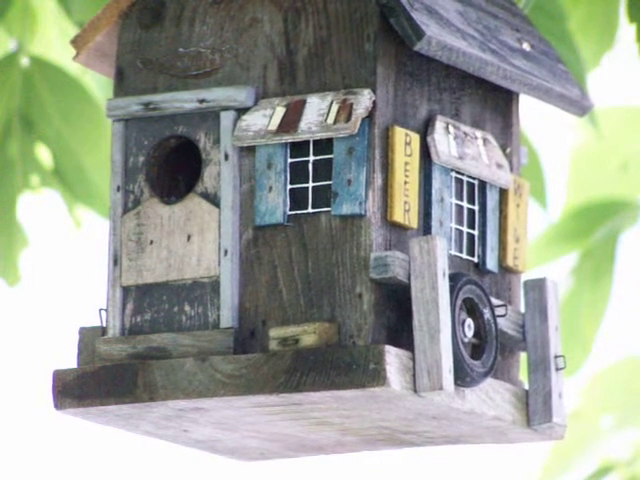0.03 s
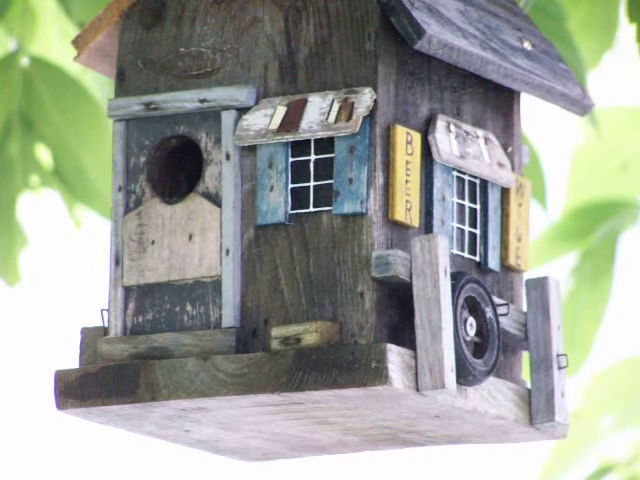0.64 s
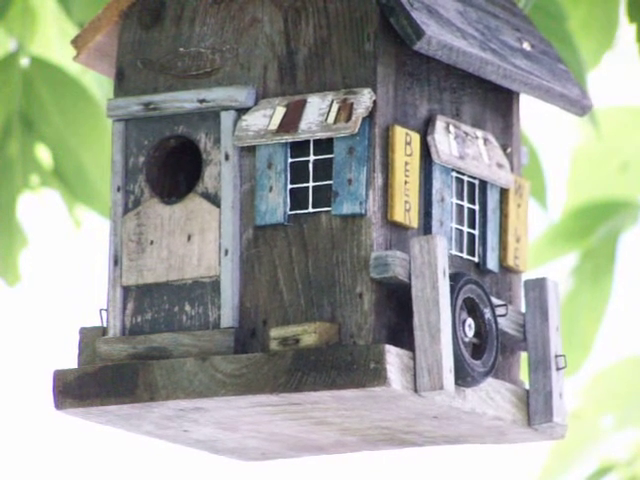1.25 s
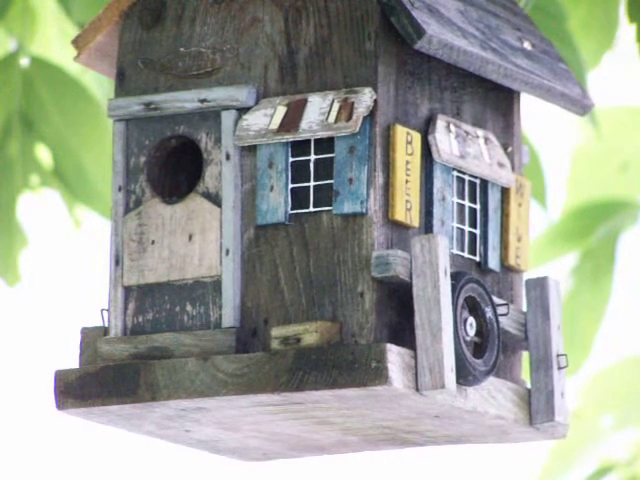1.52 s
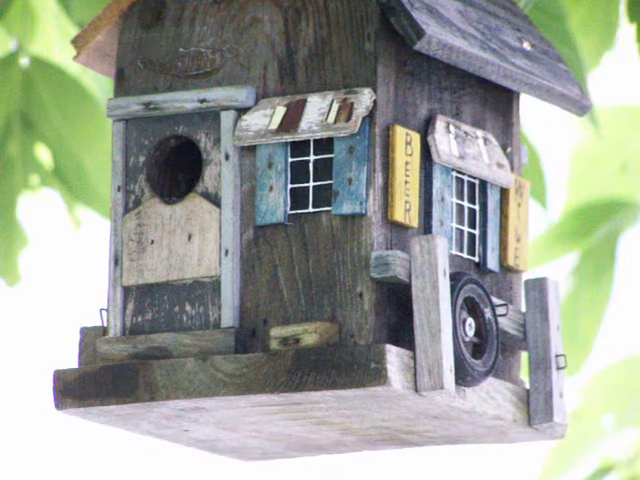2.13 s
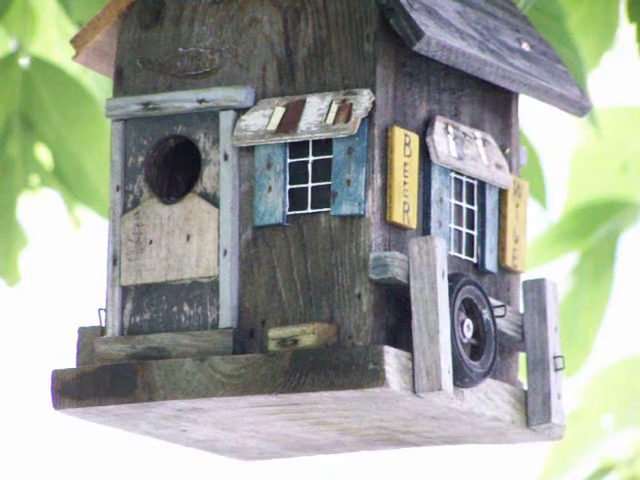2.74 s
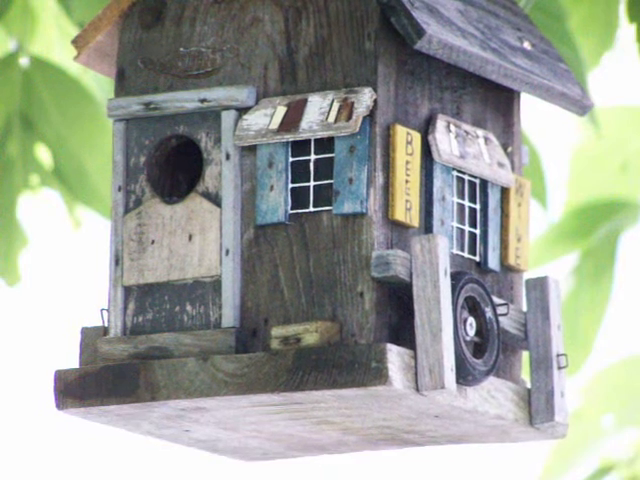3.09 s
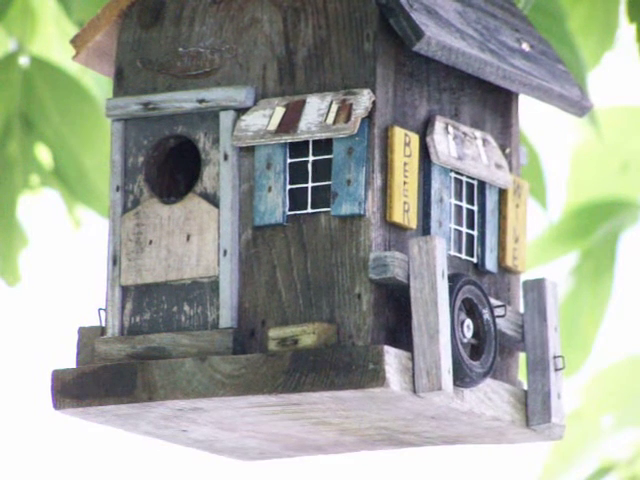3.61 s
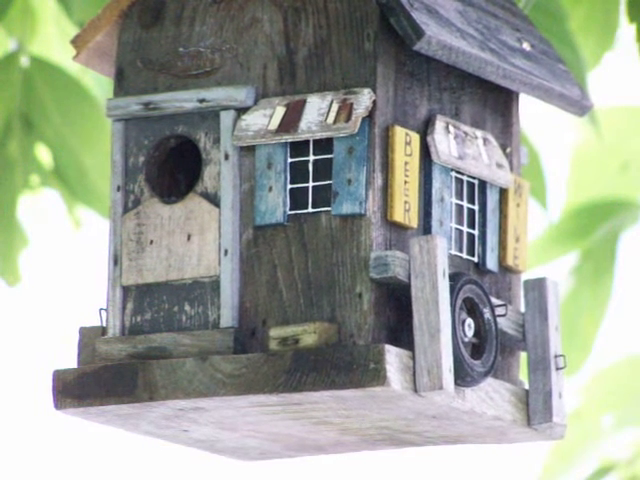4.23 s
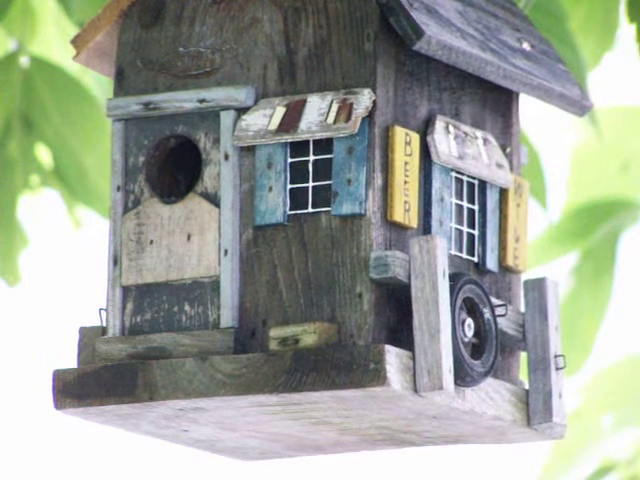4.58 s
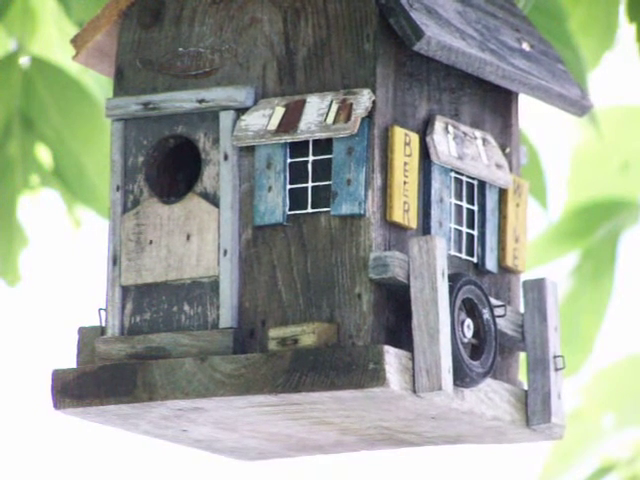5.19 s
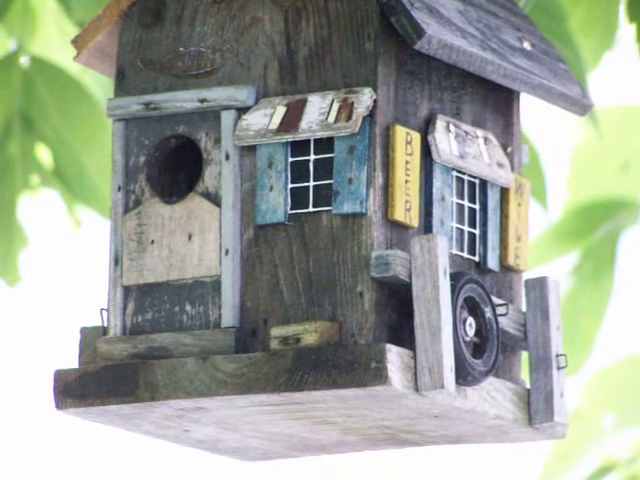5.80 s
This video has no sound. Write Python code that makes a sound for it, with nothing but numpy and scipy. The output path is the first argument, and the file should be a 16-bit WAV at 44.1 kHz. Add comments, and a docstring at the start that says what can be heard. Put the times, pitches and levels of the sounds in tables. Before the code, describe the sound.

In a quiet garden, small claws tick on a wooden birdhouse. A rooster crows once in the distance while little wings flutter in short bursts near the microphone. A bird then darts very close with a whirr and several sharp feather snaps, the loudest moment. Another brief flutter follows, then a faint hiss of begging nestlings, thin high whistles and a few more scratches over soft outdoor air.

```python
"""Small birds flutter around a wooden nest box in a leafy garden, and one darts close by.
Their wingbeats, sharp feather snaps and scratching claws are friction sounds: clusters of tiny slips
and hiss that excite the resonances of the box. Nestlings beg with a thin hiss and a bird whistles high.
Farther off a rooster crows once, a harmonic voice shaped by its throat. Wings, claws, whistles and crow
scatter into short echoes over a quiet outdoor background."""
import sys
import numpy as np
from scipy import signal
from scipy.fft import rfft, irfft, next_fast_len
from scipy.io import wavfile

SR = 44100
rng = np.random.default_rng(int(sys.argv[2]) if len(sys.argv) > 2 else 0)


def unload_wav(signal):
    """Save mono or channel-first audio to the path in sys.argv[1] as 16-bit WAV at rate SR, clipped to [-1, 1]."""
    wavfile.write(
        sys.argv[1],
        SR,
        np.round(np.clip(np.atleast_2d(signal).T, -1, 1) * 32767).astype(np.int16),
    )


N = 256220
TIME = np.arange(N) / SR


def amp(db):
    """Decibels to amplitude ratio."""
    return 10 ** (np.asarray(db) / 20)


def unit(x):
    """Normalisation to rms 1."""
    return x / np.sqrt(np.mean(x ** 2) + 1e-20)


def read(points, hz):
    """Interpolation on a logarithmic frequency axis."""
    f, value = np.transpose(points)
    return np.interp(np.log(hz + 1), np.log(f + 1), value)


def add(mix, s, sound):
    """Superposition: a sound joins the mix at s seconds, or at zero if s is negative."""
    part = mix[max(round(s * SR), 0):][:len(sound)]
    part += sound[:len(part)]


def colour(x, points, shift=1):
    """Filtering by a spectral envelope, its frequencies multiplied by shift."""
    hz = np.fft.rfftfreq(len(x), 1 / SR)
    return irfft(rfft(x) * amp(read(points, hz / shift)), len(x))


def drift(size, hz):
    """Low-pass noise: smooth random motion up to about hz, with rms near 1."""
    span = next_fast_len(max(size, SR), True)
    f = np.fft.rfftfreq(span, 1 / SR)
    return unit(irfft(rfft(rng.standard_normal(span)) * np.exp(-(f / hz) ** 2), span))[:size]


# Outdoor noise spectrum. Each row: frequency in Hz, relative level in dB.
AIR_SPECTRUM = [(15, -33.5), (25, 3.5), (132, -2.5), (181, -5), (274, -9), (729, -14), (886, -13),
                (1670, -16.5), (3570, -19.5), (5820, -22.5), (7070, -22.5), (7990, -30), (8600, -41),
                (11200, -66), (18900, -120)]
# Faint high tones. Each row: frequency in Hz, level in dB.
WHINE_TONES = [(7838, -77), (7897, -78), (8102, -81), (8161, -82)]

def background():
    """Broadband noise gives rumble and hiss; phase-modulated tones add a faint wavering whine."""
    air = unit(colour(rng.standard_normal(N), AIR_SPECTRUM)) * amp(-52 + 0.087 * drift(N, hz=8))
    whine = sum(amp(db) * np.sqrt(2) * np.sin(2 * np.pi * hz * TIME + 1.5 * drift(N, hz=20))
                for hz, db in WHINE_TONES)
    return air + whine


# Spectrum of sliding feathers. Each row: frequency in Hz, relative level in dB.
FEATHER_SPECTRUM = [(600, -47), (1950, -23), (2450, -5.5), (2800, -6.5), (3300, 0), (3750, 3), (4250, -0.5),
                    (4650, -1.5), (5700, -10.5), (6700, -20.5), (8500, -43.5)]
# Envelope of the rustle. Each row: time in seconds, relative level in dB.
RUSTLE_ENVELOPE = [(0, -57), (.45, -53), (.8, -55.5), (1.1, -48), (1.2, -57), (2.1, -58.5), (3.25, -54.5),
                   (3.55, -56.5), (4.2, -54.5), (5.15, -65.5), (5.35, -52.5), (5.81, -59.5)]

def rustle():
    """Soft feather friction: random amplitude modulation makes noise grainy."""
    grains = rng.standard_normal(N) * amp(1.7 * drift(N, hz=300) + 1.3 * drift(N, hz=25))
    return unit(colour(grains, FEATHER_SPECTRUM)) * amp(np.interp(TIME, *np.transpose(RUSTLE_ENVELOPE)))


# High notes. Each row: start and length in seconds, first and last pitch in Hz, peak level in dB.
WHISTLE_NOTES = [(-.1, 0.23, 5150, 5010, -69), (1.157, 0.15, 7040, 6940, -64),
                 (2.117, .36, 6900, 7200, -66.5), (4.746, .04, 2720, 3780, -52),
                 (4.701, 0.34, 7170, 7200, -63), (4.978, 0.23, 7200, 7080, -60),
                 (5.23, 0.27, 7320, 7340, -66.5)]

def whistles():
    """Frequency modulation: pure tones glide with a fast irregular quaver as they swell and fade."""
    out = np.zeros(N)
    for start, length, from_hz, to_hz, db in WHISTLE_NOTES:
        progress = np.linspace(0, 1, round(length * SR), endpoint=False)
        hz = (from_hz + (to_hz - from_hz) * progress) * (1 + 0.021 * drift(len(progress), hz=240))
        note = np.sqrt(2) * np.sin(2 * np.pi * np.cumsum(hz) / SR)
        add(out, start, amp(db) * note * np.sin(np.pi * progress) ** 0.71)
    return out


def friction(rows, spectrum, ticks_per_s, hiss, crest, spread_db, ring_db, ring_width_hz, broaden=0):
    """Stick-slip friction: each stroke is a swell of ticks and hiss, ringing at its centre frequency."""
    out = np.zeros(N)
    margin, spectrum_centre_hz = 512, 3750
    for start, length, db, hz in rows:
        size = int(1.5 * length * SR)
        progress = np.arange(size) / (length * SR)
        travel = np.cumsum(rng.exponential(1, size) ** 2) * ticks_per_s / (2 * SR) + rng.random()
        slips = np.diff(np.floor(travel), prepend=0) > 0
        ticks = slips * amp(spread_db * rng.standard_normal(size)) * rng.choice([-1, 1], size)
        swell = np.interp(progress, [0, crest, .8, 1.05, 1.5], [.25, 1, .7, .2, 0])
        burst = np.pad(swell * (unit(ticks) + hiss * rng.standard_normal(size)), margin)
        focus = 1 - broaden * np.clip((db + 35.5) / 10, 0, 1)  # a hard, close stroke is broader in band
        burst = colour(burst, [(f, focus * level) for f, level in spectrum], hz / spectrum_centre_hz)
        ring = signal.lfilter(*signal.iirpeak(hz, hz / ring_width_hz, SR), burst)
        burst = unit(burst) + amp(ring_db) * unit(ring)
        add(out, start - margin / SR, amp(db) * burst * np.sqrt(length * SR / np.sum(burst ** 2)))
    return out


# Claw strokes; those at .357 and 2.351 s swell into the snaps that follow. Each row: start and length in
# seconds, relative level in dB, centre in Hz.
CLAW_STROKES = [(.152, 0.011, -47, 3630), (.211, 0.0055, -48.5, 3850), (.229, 0.0053, -47, 3700),
                (.335, 0.021, -53, 3730), (.357, 0.012, -35.5, 3710), (.618, 0.0041, -40, 3320),
                (.687, 0.0093, -49, 3470), (2.351, 0.026, -41.5, 3370), (4.683, 0.017, -52.5, 3850),
                (5.287, .013, -47.5, 3700), (5.305, 0.0089, -39.5, 3820), (5.367, 0.0052, -39.5, 4250),
                (5.612, 0.041, -47, 4580)]
# Spectrum of a scratch. Each row: frequency in Hz, relative level in dB.
CLAW_SPECTRUM = [(800, -28.5), (2300, -15.5), (2950, -16.5), (3400, -1.5), (4000, -7.5), (4800, -9),
                 (6400, -17), (8500, -37)]

def claws():
    """Claws stick and slip on wood, giving ticks and hiss in equal parts."""
    return friction(CLAW_STROKES, CLAW_SPECTRUM, ticks_per_s=1000, hiss=1.0, crest=0.26,
                    spread_db=2.5, ring_db=-15, ring_width_hz=450)


# Feather snaps. Each row: start and length in seconds, relative level in dB, centre in Hz.
SNAP_STROKES = [(.365, 0.0038, -49, 3600), (.572, 0.004, -46.5, 3400), (2.359, .008, -26, 3230),
                (2.465, 0.0067, -40, 3530), (3.095, 0.0049, -13, 3770), (3.154, 0.0056, -19, 3000),
                (3.185, .0057, -16, 3620), (3.232, 0.0052, -15, 3970), (3.265, .0041, -20, 3610),
                (3.9, 0.0028, -25, 3780), (3.921, 0.0033, -32, 3500), (3.968, 0.0046, -51, 4000),
                (4.176, .014, -49.5, 3000), (5.8, 0.0081, -26.5, 4210)]
# Spectrum of a snap. Each row: frequency in Hz, relative level in dB.
SNAP_SPECTRUM = [(400, -45), (1200, -18.5), (1800, -16.5), (2300, -5), (2600, -10.5), (3000, 7), (3600, -4),
                 (4400, 4.5), (5200, -4), (6200, -6.5), (7500, -18.5), (8600, -31)]

def wing_snaps():
    """Impulsive excitation: feathers slip for a few milliseconds and drive a narrow resonance."""
    return friction(SNAP_STROKES, SNAP_SPECTRUM, ticks_per_s=1300, hiss=0.24, crest=0.18,
                    spread_db=1.5, ring_db=-6.5, ring_width_hz=69)


# The rooster's throat response from afar. Each row: frequency in Hz, gain in dB.
THROAT_SPECTRUM = [(400, -10), (520, 1.5), (640, -14.5), (730, -9.5), (1000, -2.5), (1250, -8.5),
                   (1470, -0.5), (1800, -7.5), (2200, -20), (2500, -11.5), (2850, -13), (3400, -23),
                   (4900, -34), (6200, -23.5), (7000, -36)]
# Its narrow resonances. Each row: centre and half-width in Hz, peak boost in dB.
THROAT_RESONANCES = [(2607, 39, 22), (5500, 40, 15), (6230, 90, 3.5)]

def clear_voice(hz, phase, rough, upper_db):
    """Source and filter: ten harmonics slide through the resonances of the throat."""
    voice = np.zeros(len(hz))
    for k in range(1, 11):
        rings_db = sum(peak / (1 + ((k * hz - centre) / width) ** 2)
                       for centre, width, peak in THROAT_RESONANCES)
        fading_db = 1.8 * drift(len(hz), hz=18)  # each harmonic's level wavers at random by itself
        db = read(THROAT_SPECTRUM, k * hz) + rings_db + fading_db + upper_db * (k > 2)
        weight = (1 - rough) ** 2 if k == 1 else 1  # a hoarse voice loses its fundamental
        voice += weight * amp(db) * np.cos(k * phase)
    return voice


# Pitch contour of the crow. Each row: time in seconds, pitch in Hz.
CROW_CONTOUR = [(.87, 698.5), (1.19, 725.3), (1.27, 743), (1.37, 727.3), (1.52, 718.3), (1.635, 741),
                (1.71, 713.2), (1.95, 695), (2.17, 672.7), (2.35, 639.7), (2.46, 581), (2.6, 482)]
# Spectrum of the rasp. Each row: frequency in Hz, relative level in dB.
RASP_SPECTRUM = [(400, -19), (750, -11), (1100, -10), (1430, -7), (1680, -1.5), (2050, -3), (2350, -11.5),
                 (2700, 4), (3200, -18.5), (4000, -21.5), (5200, -18), (7000, -42.5)]
# Syllables. Each row: start, length and rise in seconds, relative level in dB, initial hoarseness
# from 0 to 1, clearing time in seconds, lift of the upper harmonics in dB.
CROW_SYLLABLES = [(.868, 0.13, 0.043, -41.5, 0.53, .9, -4), (1.164, 0.11, 0.12, -35, 0.63, 0.068, -0.5),
                  (1.299, 0.31, 0.12, -42, 0.93, 0.13, 4.5), (1.598, 0.937, 0.039, -41.5, 0.11, .05, 3)]

def rooster():
    """Uneven vibration makes each syllable start hoarse; as pitch sags, the voice weakens and dulls."""
    out = np.zeros(N)
    full_effort_hz, release_s, fade_db_per_s = 740, 0.032, 4
    weaker_db_per_octave, duller_db_per_octave = 18, 25.5
    for start, length, rise_s, db, hoarse, clear_s, bright_db in CROW_SYLLABLES:
        t = np.arange(0, length + 4 * release_s, 1 / SR)
        size = len(t)
        swell = np.minimum(t / rise_s, 1) * np.exp(-np.maximum(t - length, 0) / release_s)
        rough = np.clip(0.054 + hoarse * np.exp(-(t / clear_s) ** 2), 0, 1)
        hz = np.interp(start + t, *np.transpose(CROW_CONTOUR))
        sag = np.log2(full_effort_hz / hz)  # octaves
        falter = (0.00334 + 0.055 * np.maximum(sag, 0) ** 2) * drift(size, hz=38.8)
        hz = hz * (1 + falter + 0.038 * rough * drift(size, hz=150))
        phase = 2 * np.pi * np.cumsum(hz) / SR
        voice = clear_voice(hz, phase, rough, upper_db=bright_db - duller_db_per_octave * sag)
        rasp = unit(colour(rng.standard_normal(size) * (1 + np.cos(phase)), RASP_SPECTRUM))
        tremble = amp(1.7 * drift(size, hz=45))
        call = np.sqrt(2) * voice * tremble * np.sqrt(1 - rough ** 2) + 1.35 * rough * rasp
        add(out, start, amp(db - fade_db_per_s * t - weaker_db_per_octave * sag) * swell * call)
    return out


def swishes(strokes):
    """Friction of feathers in a wing stroke: a hissy burst with a broad resonance."""
    return friction(strokes, FEATHER_SPECTRUM, ticks_per_s=700, hiss=0.9, crest=0.15,
                    spread_db=2.5, ring_db=-6, ring_width_hz=450, broaden=0.69)


# Runs of wingbeats. Each row: start in seconds, number of beats, period in seconds, relative levels
# of the first and last beat in dB, boost of the first upstroke in dB, centre in Hz.
WINGBEAT_RUNS = [(1.376, 2, .079, -37, -37.5, 8.5, 3780), (1.501, 1, 0.076, -39, -39.5, 8.5, 3850),
                 (1.584, 1, 0.066, -36, -36.5, 12, 3940), (1.812, 1, .06, -47, -48, -6, 3450),
                 (2.186, 1, .06, -39, -40, 6, 3830), (2.578, 4, .0615, -36.5, -34.5, 7.5, 3835),
                 (2.98, 1, .06, -48, -48.5, -2, 3360), (3.79, 3, 0.056, -37.5, -39.5, 9.5, 3750),
                 (3.965, 1, .06, -39.5, -40.5, -10, 3830)]

def wingbeats():
    """Periodic excitation: each beat is a downstroke followed by a usually softer upstroke."""
    stroke_s, upstroke_delay_s, upstroke_db = 0.029, 0.028, -11.5
    strokes = []
    for start, beats, period, first_db, last_db, push_db, hz in WINGBEAT_RUNS:
        for k, db in enumerate(np.linspace(first_db, last_db, round(beats))):
            onset = start + k * period
            strokes.append((onset, stroke_s, db, hz))
            strokes.append((onset + upstroke_delay_s, stroke_s, db + upstroke_db + push_db * (k == 0), hz))
    return swishes(strokes)


# A close pass. Each row: time in seconds, relative level in dB, centre of the swish in Hz.
DART_PATH = [(3.066, -42.5, 3550), (3.132, -40.5, 3630), (3.164, -27, 3530), (3.222, -33.5, 3850),
             (3.28, -29.5, 4140), (3.312, -39.5, 3900), (3.385, -57, 3900)]

def dart(stroke_s=0.0238):
    """Strokes without a pause fuse into a whirr, louder as the bird nears."""
    times, db, hz = np.transpose(DART_PATH)
    onsets = np.arange(times[0], times[-1], stroke_s)
    return swishes([(t, stroke_s, np.interp(t, times, db), np.interp(t, times, hz)) for t in onsets])


# Envelope of the begging. Each row: time in seconds, level in dB.
BEG_ENVELOPE = [(3.9, -49.5), (4.05, -58), (4.35, -57), (4.62, -58), (4.8, -59), (4.95, -76)]
# Spectrum of the begging. Each row: frequency in Hz, relative level in dB.
BEG_SPECTRUM = [(1200, -5.5), (2200, -13.5), (3200, -14), (4300, -1), (5200, -6.5), (5850, -5.5),
                (6100, 4.5), (6400, -15), (7000, -5.5), (7600, -31.5)]

def nestlings():
    """Filtered, modulated noise: a wheezy begging hiss with a thin resonance on top."""
    wheeze = rng.standard_normal(N) * amp(1.6 * drift(N, hz=60))
    db = np.interp(TIME, *np.transpose(BEG_ENVELOPE), left=-120, right=-120)
    return unit(colour(wheeze, BEG_SPECTRUM)) * amp(db)


# Modes of the nest box. Each row: frequency and bandwidth in Hz, gain in dB.
BOX_MODES = [(2300, 120, -4), (3000, 590, -11), (3450, 190, -5.5), (3850, 47, -11), (4094, 37, -13.5)]

def nest_box(x, direct_db):
    """Cavity resonance: sound made at the box rings briefly in its hollow."""
    rings = sum(amp(db) * signal.lfilter(*signal.iirpeak(hz, hz / width, SR), x)
                for hz, width, db in BOX_MODES)
    return amp(direct_db) * x + rings


# Decay of the garden's echoes. Each row: frequency in Hz, reverberation time in seconds.
GARDEN_T60 = [(500, 1), (2000, 0.41), (4000, 0.33), (8000, 0.4)]

def garden(x, gap_s, echoes_per_s=3000):
    """Scattering from leaves, trunks and walls gives a tail of echoes whose treble dies first."""
    taps = rng.choice([-1., 1.], SR) * (rng.random(SR) < echoes_per_s / SR)
    taps *= np.arange(SR) > gap_s * SR
    hz, t, spectra = signal.stft(taps, SR, nperseg=256)
    decay = amp(-60 * t / read(GARDEN_T60, hz)[:, None])
    tail = signal.istft(spectra * decay, SR, nperseg=256)[1]
    return signal.fftconvolve(x, tail / np.linalg.norm(tail))[:N]


def scene():
    """Direct and reverberant sound add: the near wings are fairly dry, the far voices carry more echo."""
    strokes = wingbeats() + dart() + wing_snaps() + claws()
    flutter = nest_box(amp(-0.5) * strokes + amp(-4) * rustle(), direct_db=-1.5)
    crow, notes = amp(-1.42) * rooster(), whistles()
    echoes = garden(amp(-5.5) * flutter, gap_s=0.0034)
    echoes += garden(amp(-3.5) * crow + amp(-0.5) * notes, gap_s=0.0056)
    return (flutter + crow + notes + nestlings() + echoes + background())[None]


def record(dry):
    """Band limiting: a steep low-pass filter removes the highest treble."""
    cutoff_hz = 8740
    lowpass = signal.firwin(255, cutoff_hz, window=("kaiser", 9), fs=SR)
    return signal.oaconvolve(dry, lowpass[None], "same")


dry = scene()
out = record(dry)
unload_wav(out)
```